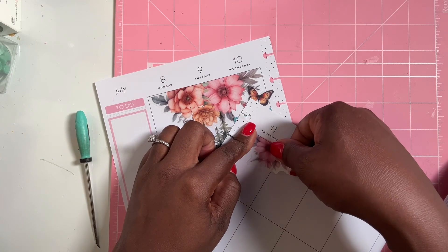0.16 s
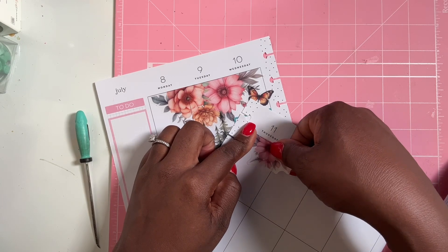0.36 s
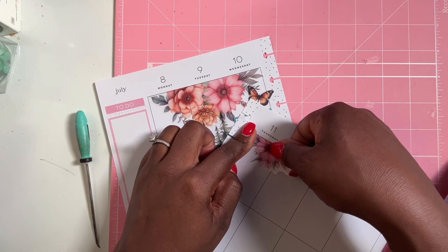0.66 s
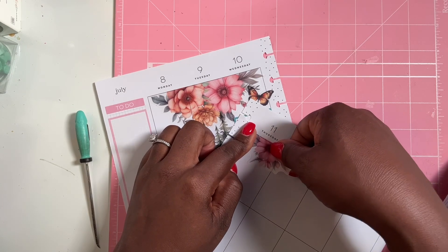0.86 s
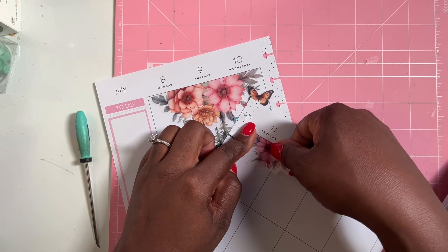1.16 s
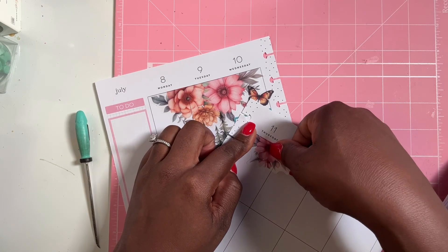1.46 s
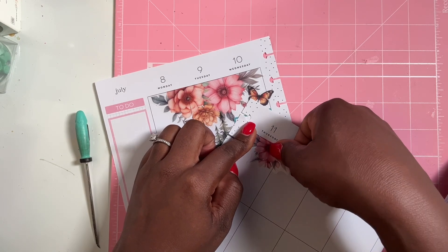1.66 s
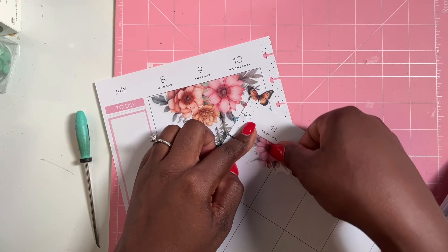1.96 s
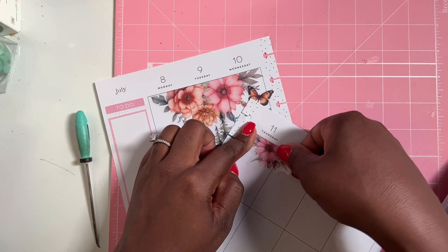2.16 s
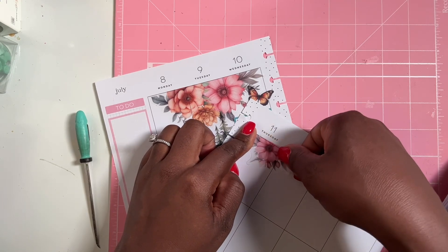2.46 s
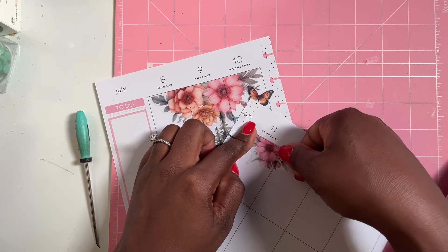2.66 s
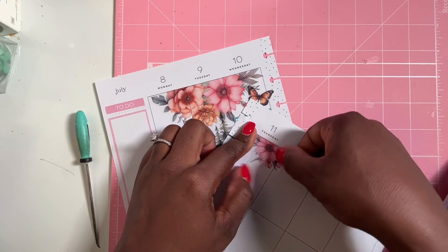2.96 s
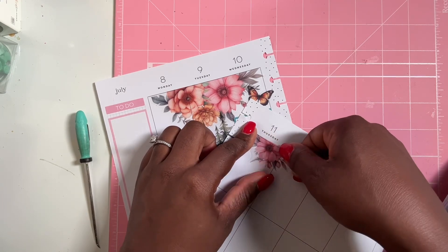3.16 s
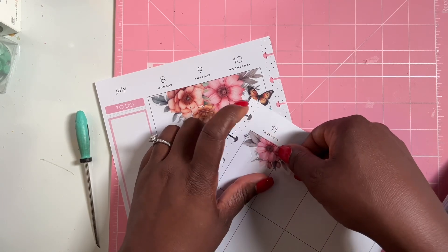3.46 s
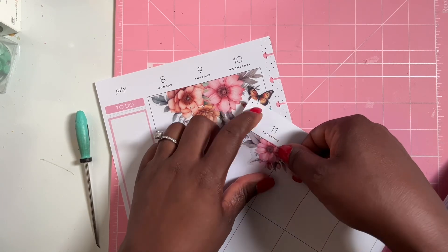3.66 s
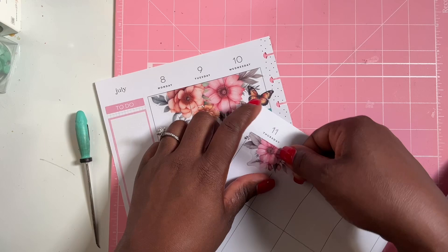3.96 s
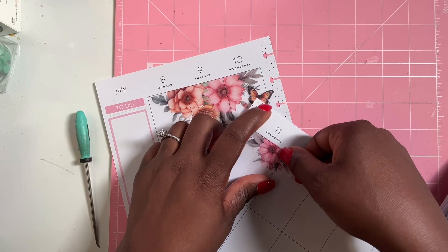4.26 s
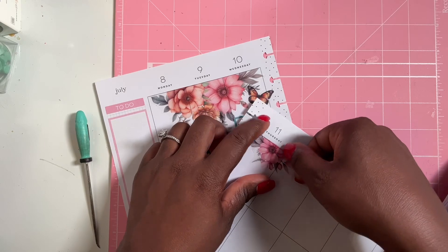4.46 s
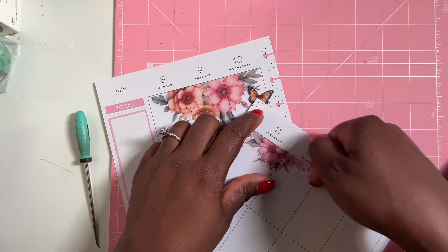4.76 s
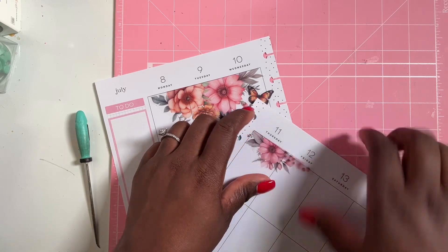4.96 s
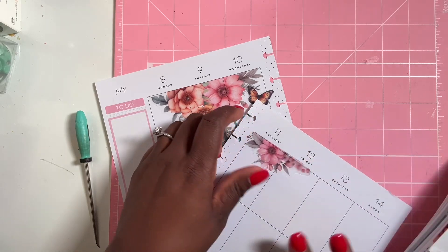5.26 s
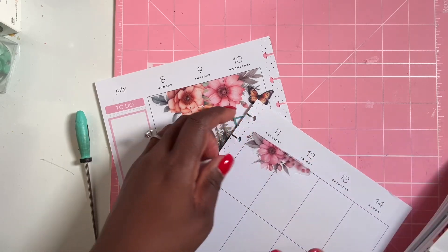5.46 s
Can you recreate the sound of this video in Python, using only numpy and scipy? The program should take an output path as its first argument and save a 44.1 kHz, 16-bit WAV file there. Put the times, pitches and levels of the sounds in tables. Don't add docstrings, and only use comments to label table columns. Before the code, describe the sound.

A close, dry stereo pickup of hands and paper on a desk in a small quiet room. A steady low motor hum with slightly unsteady rumble and bass-heavy air lasts throughout; a far engine drone wavers and sinks beneath it. Very faint, high rough squeaks come about every 0.7 s until 2.3 s. At 0.2 s a tiny tick, at 0.55-0.62 s crisp clicks with thin hiss, then near stillness. From 1.57 s soft taps and a low thump begin; bright glue ticks cluster at 2.05-2.35 s, with a firm press and a nail knock at 2.68 s. A very sharp crack at 2.98 s opens louder rustling, buckling and thumps to 3.35 s. Strokes continue at 3.6-3.7 s, with the strongest rub near 3.98 s. Flicks around 4.5 s lead to a hard snap, knock and thump at 4.67 s. Light ticks follow at 5.19 and 5.47 s, then a tap at 5.6 s.

```python
import sys
import numpy as np
from scipy import signal
from scipy.fft import rfft, irfft, next_fast_len
from scipy.io import wavfile

SR = 44100
rng = np.random.default_rng(int(sys.argv[2]) if len(sys.argv) > 2 else 0)


def unload_audio(sound):
    columns = np.transpose(np.atleast_2d(sound))
    steps = np.round(np.clip(columns, -1, 1) * 32767)
    wavfile.write(sys.argv[1], SR, steps.astype(np.int16))


def magnitude_from_level(level_db):
    exponent = np.asarray(level_db, float) / 20
    return 10 ** exponent


N = 247128
SIZE = next_fast_len(N + SR // 2)
HZ = np.maximum(np.arange(SIZE // 2 + 1) * SR / SIZE, 1)

# f/Hz, width/Hz, level/dB
SHEET_MODES = [(2010, 74, 3.5), (2400, 59, 6.5), (3820, 550, 2.5), (6370, 770, 12)]


def at_hz(points):
    hz, value = np.transpose(points)
    return np.interp(np.log(HZ), np.log(hz), value)


def rms_one(x):
    return x / np.sqrt(np.mean(x ** 2) + 1e-20)


def band(x, low_hz, high_hz):
    edges = [low_hz, min(high_hz, .45 * SR)]
    return signal.sosfilt(signal.butter(2, edges, "band", fs=SR, output="sos"), x)


def dull(x, hz):
    return signal.sosfilt(signal.cheby2(8, 40, hz * 1.08, fs=SR, output="sos"), x)


def resonance(x, hz, width_hz):
    r = np.exp(-np.pi * width_hz / SR)
    zeros = np.array([1, 0, -1]) * (1 - r * r) / 2
    poles = [1, -2 * r * np.cos(2 * np.pi * hz / SR), r * r]
    return signal.lfilter(zeros, poles, x)


def sheet(x, modes):
    return sum((-1) ** k * magnitude_from_level(db) * resonance(x, hz, width_hz)
               for k, (hz, width_hz, db) in enumerate(modes))


def flicker(rate_hz):
    r = np.exp(-2 * np.pi * rate_hz / SR)
    wander = signal.lfilter([1], [1, -2 * r, r * r], rng.standard_normal(N + SR))
    return rms_one(wander[SR:])


def swell(s, swell_s, fade_s, db, steep=1):
    t = np.arange(0, N + 32, 32) / SR - s
    away = np.maximum(-t / max(swell_s, .005), t / max(fade_s, .005))
    gain = magnitude_from_level(db - 20 * steep * away)
    return np.interp(np.arange(N) / 32, np.arange(len(t)), gain)


def add(track, s, piece):
    at = int(s * SR)
    track[at:at + len(piece)] += piece[:len(track) - at]


def ports(near):
    # f/Hz, phase/rad
    lead = [(20, 0.), (400, 0.), (4100, .1), (5500, 1.3), (6900, 1.9), (9200, 3.14), (11000, 4.1),
            (12400, 5.2), (14500, 6.2), (18000, 6.4)]
    # f/Hz, level/dB
    pan = [(130, -.3), (300, 2.5), (1000, 2.0), (2500, -.2), (5000, -1.2), (9000, -.1)]
    left = np.exp(.5j * at_hz(lead)) * magnitude_from_level(at_hz(pan) / 2)
    return irfft(rfft(near, SIZE) * np.array([left, 1 / left]), SIZE)[:, :N]


def diffuse(three):
    # f/Hz, share
    common = [(30, .9998), (60, 1), (130, 0.98), (290, 0.54), (640, 0.014), (3000, .05), (5000, 0.21),
              (7000, 0.85), (9000, 0.97), (16000, .995)]
    alike = np.clip(at_hz(common), 0, 1)
    shared, *own = rfft(three, SIZE)
    separate = irfft(np.array(own) * np.sqrt(1 - alike), SIZE)[:, :N]
    return ports(irfft(shared * np.sqrt(alike), SIZE)) + separate


def air():
    # f/Hz, level/dB per Hz
    spectrum = [(15, -100), (30, -84.5), (45, -75.5), (90, -74.5), (190, -86.5), (300, -86.5), (500, -88),
                (900, -92.5), (1500, -94), (2400, -98.5), (3000, -105), (4500, -112), (7000, -121),
                (10000, -128)]
    white = rfft(rng.standard_normal((3, SIZE)))
    return diffuse(irfft(white * magnitude_from_level(at_hz(spectrum)) * np.sqrt(SR / 2), SIZE))


def drone():
    # t/s, f/Hz, level/dB rms
    course = [(0, 43.2, -68), (.7, 42.6, -72), (1.1, 38, -55), (1.6, 38.1, -82.5), (2.101, 41.8, -58),
              (2.501, 34.6, -69), (3.001, 32.4, -64), (3.8, 33.35, -61.5), (4.2, 32.18, -54),
              (4.899, 30.75, -55), (5.61, 32.5, -60.5)]
    s, hz, db = np.transpose(course)
    t = np.arange(N) / SR
    turn = 2 * np.pi * np.cumsum(np.interp(t, s, hz)) / SR
    return np.sqrt(2) * magnitude_from_level(np.interp(t, s, db)) * np.sin(turn)


def motor():
    # f/Hz, level/dB rms
    harmonics = [(64.6, -57.5), (129.2, -55), (258.4, -68.5), (323.0, -69), (387.6, -74)]
    # f/Hz, width/Hz, level/dB rms
    skirts = [(25.7, 2, -73), (60.8, 16, -54.5), (124.1, 25.4, -56.5), (256.8, 23, -69), (321, 19, -71),
              (384.5, 10, -76)]
    t = np.arange(N) / SR
    hum = sum(np.sqrt(2) * magnitude_from_level(db) * np.sin(2 * np.pi * (hz * t + rng.random())) for hz, db in harmonics)
    noise = rng.standard_normal(N + SR)
    for hz, width_hz, db in skirts:
        rumble = resonance(resonance(noise, hz, width_hz), hz, width_hz)
        hum = hum + magnitude_from_level(db) * rms_one(rumble[SR:])
    return hum


def squeaks(length_s=0.072):
    # t/s, level/dB
    turns = [
        (.09, -82),
        (0.798, -82),
        (1.52, -81),
        (2.24, -80),
    ]
    out, t = np.zeros(N), np.arange(int(length_s * SR)) / SR
    phase = 2 * np.pi * np.cumsum(4530 + 110 * t / length_s) / SR
    for s, db in turns:
        rough = 1 + 1.3 * rms_one(band(rng.standard_normal(len(t)), 18, 130))
        tone = np.sin(3 * phase) + 0.48 * np.sin(2 * phase)
        add(out, s, magnitude_from_level(db) * rough * np.sin(np.pi * t / length_s) * tone)
    return out


def echoes(x):
    desk_db, desk_t60_s = -27.5, .04
    room_db, room_t60_s = -39, .1
    t = np.arange(SR // 2) / SR
    noise = rng.standard_normal((2, 3, len(t)))
    desk = magnitude_from_level(desk_db - 60 * t / desk_t60_s) * band(noise[0], 330, 6300) * (t > .001)
    room = magnitude_from_level(room_db - 60 * t / room_t60_s) * band(noise[1], 300, 5700) * (t > .004)
    return diffuse(irfft(rfft(x, SIZE) * rfft(desk + room, SIZE), SIZE))


def blows(table, rise_s, sag):
    out, t = np.zeros(N), np.arange(SR // 4) / SR
    for s, db, hz, t60_s in table:
        pitch_hz = hz * (1 - sag * np.minimum(t / t60_s, 1))
        turn = 2 * np.pi * np.cumsum(pitch_hz) / SR
        ring = np.sin(turn) * (1 - np.exp(-t / rise_s)) * magnitude_from_level(-60 * t / t60_s)
        add(out, s, magnitude_from_level(db) * ring / np.abs(ring).max())
    return out


def thumps():
    # t/s, peak level/dB, f/Hz, t60/s
    presses = [
        (1.576, -42, 131, 0.18),
        (1.867, -41.5, 121, 0.083),
        (2.354, -38.5, 116.4, 0.14),
        (2.695, -39.5, 116, 0.2),
        (3.048, -39.5, 111.6, 0.12),
        (3.261, -40, 121, 0.18),
        (3.319, -40, 120, 0.15),
        (3.629, -41, 120, 0.11),
        (4.537, -42.5, 117.8, 0.081),
        (4.683, -35.5, 122, 0.12),
    ]
    return blows(presses, rise_s=0.0018, sag=0.24)


def knocks():
    # t/s, peak level/dB, f/Hz, t60/s
    taps = [(1.8325, -43, 830, 0.029), (1.839, -41, 567, 0.027), (1.848, -47, 770, 0.036),
            (1.977, -46, 603, 0.013), (2.101, -48, 817, 0.023), (2.6826, -34, 812, 0.03),
            (2.6895, -37, 620, 0.016), (3.245, -40.5, 1270, 0.03), (3.299, -42, 1110, 0.0079),
            (3.321, -42, 1160, 0.041), (4.648, -45.5, 850, 0.017), (4.6692, -34, 1070, 0.011),
            (4.674, -41, 651, .03), (5.5965, -40.5, 1065, 0.064)]
    return blows(taps, rise_s=0.001026, sag=0.071)


def fibres(per_s, spread_db, smooth):
    born = rng.random((3, N)) < per_s * magnitude_from_level(4.0 * flicker(25)) / SR
    sizes = magnitude_from_level(spread_db * np.minimum(rng.exponential(1, (3, N)), 4))
    clicks = born * sizes * rng.choice([-1, 1], (3, N))
    return rms_one(clicks) + smooth * rng.standard_normal((3, N))


def slides(near_share=0.17):
    # peak t/s, swell/s, fade/s (20 dB
    # each), level/dB, brightness/dB
    movements = [(.21, 0.026, .06, -71, -5), (.56, 0.054, 0.23, -71, 5), (.62, 0.17, 0.092, -79, -14),
                 (1.57, .05, .15, -79, -3), (1.81, .03, 0.089, -69, -9), (1.88, .08, .12, -83, -2),
                 (2.04, 0.18, 0.12, -71, 3), (2.11, 0.074, 0.16, -67, 1.1), (2.19, 0.091, 0.053, -68, -17),
                 (2.31, 0.089, 0.04, -73, -10), (2.419, 0.13, 0.046, -75.5, -0.5), (2.50, .03, .1, -76, 2),
                 (2.62, 0.029, 0.086, -74.5, 4.5), (2.73, 0.16, 0.16, -71, -9),
                 (2.89, 0.038, .4, -68.5, -12), (3.0, 0.084, .2, -59.5, -14), (3.13, 0.15, .03, -55, 2.7),
               (3.24, 0.03, .12, -61.5, 4), (3.33, 0.14, .025, -56.5, -5), (3.61, 0.036, .3, -60, -2),
               (3.70, 0.12, .15, -59, -5.5), (3.90, 0.34, .3, -62.5, -4), (3.98, 0.12, .05, -47.5, -9),
               (4.03, .02, .15, -77.5, -20), (4.29, .04, .07, -67, -12), (4.43, 0.025, .3, -61, -0.5),
               (4.5, .03, .08, -56.5, -1.5), (4.70, 0.07, .06, -60, -4), (4.79, .1, .07, -68, -3.5),
               (4.96, .1, .05, -80, -7.5), (5.16, 0.027, .07, -69, 6), (5.24, .2, .08, -71, -10.1),
               (5.483, .02, .03, -61, 6.5), (5.56, 0.17, .2, -79.5, -8)]
    # peak t/s, swell/s, fade/s (20 dB each), level/dB
    buckles = [
        (2.359, 0.056, 0.032, -48.5),
        (3.05, 0.048, 0.11, -53.5),
        (3.17, 0.36, 0.36, -56.5),
        (3.25, 0.017, 0.041, -40.5),
        (3.321, 0.067, 0.025, -38),
        (4.68, .025, 0.054, -43),
    ]
    steepness = [1.074, 1.1, 1.31]
    patchy_db = [1.27, 1.5, 2]
    rub = fibres(per_s=3700, spread_db=6.0, smooth=0.95)
    later_rub = np.roll(rub, 40, axis=1)
    low_rub = band(sheet(rub, SHEET_MODES[:3]) + .3 * later_rub, 1700, 5400)
    high_rub = band(sheet(rub, SHEET_MODES[3:]) + .7 * later_rub, 4300, 7200)
    hiss = band(band(rub, 9800, 14800), 9800, 15500)
    moving = 0
    for k, layer in enumerate([low_rub, high_rub, hiss]):
        gain = 0
        for *move, bright_db in movements:
            tone_db = [0, bright_db, -6 + bright_db][k]
            gain = gain + swell(*move, steep=steepness[k]) * magnitude_from_level(tone_db)
        moving = moving + gain * magnitude_from_level(patchy_db[k] * flicker(18)) * rms_one(layer)
    crumple = rms_one(band(fibres(per_s=440, spread_db=1.0, smooth=0.6), 170, 1600))
    moving = moving + sum(swell(*move) for move in buckles) * magnitude_from_level(-5.0) * crumple
    return np.sqrt(near_share) * ports(moving[0]) + np.sqrt(1 - near_share) * diffuse(moving)


def snaps():
    # low f/Hz, high f/Hz, level/dB, rattle length factor
    bands = [(300, 1650, -15, 1.6), (1700, 2750, -1, 1.6), (2750, 4600, 0, 1.3), (4600, 7400, 0, .9),
             (7400, 10500, 1, .8), (10700, 15200, 0, .8)]
    # t/s, peak level/dB, body/dB re peak, fine edge/dB re peak
    glue_ticks = [(0.2108, -55.5, -6, -15), (0.5685, -47, -20, -5), (0.6122, -30, -25, -1.5),
                  (2.054, -50, -20, 0), (2.0785, -54, -5, -12), (2.0917, -39.5, -14, -2),
                  (2.1025, -42, -21, 0), (2.1305, -27.5, -20, -4), (2.1789, -26.5, -12, -5.5),
                  (2.3496, -30.5, -20, -22), (2.5266, -54, -15, -5), (3.1751, -39.5, 3.5, -47),
                  (3.574, -53, -19, -38), (3.7123, -38.5, 1, -7), (3.7204, -43, -2, -8),
                  (4.6922, -36, -17.5, -3), (5.1886, -41.5, -15, 1)]
    # t/s, peak level/dB, body/dB re peak, fine edge/dB re peak
    edge_flicks = [(0.5429, -46, -19, 3), (0.5523, -45, -24, -1), (1.5754, -48, -7, 0),
                   (1.8064, -54, -9, -23), (2.1708, -33, -16, -4), (3.2308, -31, 1.1, -13),
                   (3.3168, -47, 5, 6), (3.6131, -69, 11.5, 11), (3.8313, -63, 21, -10),
                   (4.2704, -51, 0.5, -17), (4.487, -50, -2, -14), (4.4949, -36.5, -10.5, -14),
                   (4.5445, -28, -6, -4.5), (4.6701, -19, -.6, -1.5), (5.4741, -48.5, -25, 4.5)]
    # t/s, peak level/dB, body/dB re peak, fine edge/dB re peak
    page_cracks = [(0.623, -34.5, -14, 2.5), (1.8644, -41.5, -15, -9), (2.3338, -52, -15, -40),
                   (2.6096, -56.5, -8, -19), (2.9726, -56, 8, -13), (2.9816, -19, -11, 8.5),
                   (3.0472, -52, 2, 6), (3.247, -45.5, 5, 4), (3.2555, -48, -5, 8),
                   (3.2702, -35.5, -29, -16), (3.2983, -26.5, -11.5, -2.1), (3.6179, -47, -5.5, -2.1),
                   (3.6477, -34.5, -3, 3), (4.648, -43, 1, -21)]
    rows = []
    for table, ring_db in [(glue_ticks, -11.5), (edge_flicks, 6.5), (page_cracks, -1.1)]:
        for s, db, body, fine in table:
            rows.append((s, db + np.array([body - 3, body, body / 2 + ring_db, 0, .75 * fine - 1.5, fine])))
    t = np.arange(512) / SR
    shaken = rng.standard_normal((len(rows), len(t)))
    rattles = 1.2 * shaken + 1.8 * sheet(shaken, SHEET_MODES) + 1.5 * resonance(shaken, 3900, 500)
    step = np.zeros(len(t))
    step[0] = 1
    step[int(.00068 * SR)] = magnitude_from_level(-6)
    out = 0
    for k, (low_hz, high_hz, band_db, longer) in enumerate(bands):
        track = np.full(N, 1e-18)
        for (s, levels), rattle in zip(rows, rattles):
            hard_db = max(levels.max() + 46, 0)
            rattle_ms = 0.81 + 0.02 * hard_db
            decay = np.exp(-1000 * t / max(rattle_ms * longer, .2))
            fading = magnitude_from_level(-13 - .24 * hard_db) * rattle * decay
            burst = band(band(step + fading, low_hz, high_hz), low_hz, high_hz)
            add(track, s - .00045, magnitude_from_level(levels[k] + band_db) * burst / np.abs(burst).max())
        out = out + track
    return out


def scene():
    hits = snaps() + knocks()
    near = hits + thumps() + motor() + drone() + squeaks()
    rubbing = dull(echoes(hits) + slides(), 14600)
    return ports(near) + rubbing + dull(air(), 14200)


def top_cut(x):
    return signal.sosfilt(signal.butter(12, 16890, fs=SR, output="sos"), x)


def record(dry):
    mix = dull(dry, 15700)
    return top_cut(mix)


dry = scene()
out = record(dry)
unload_audio(out)
```